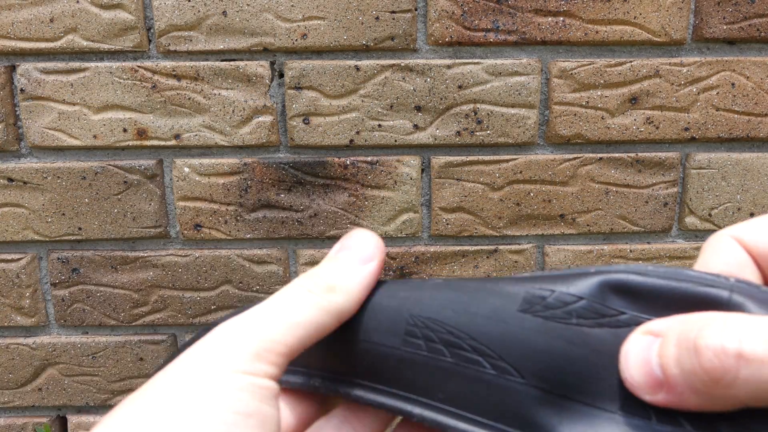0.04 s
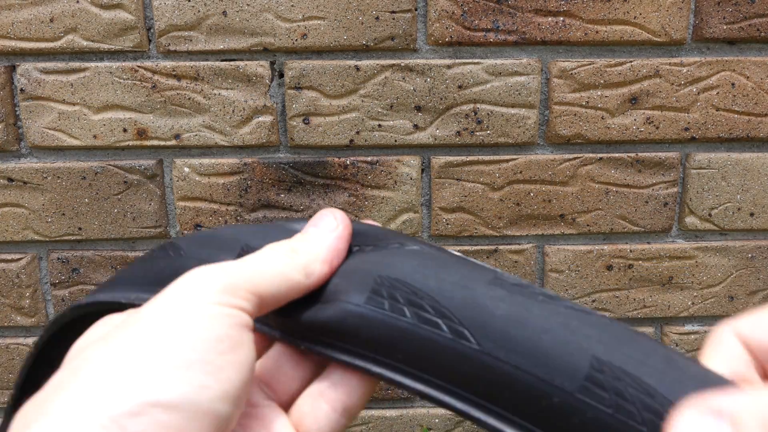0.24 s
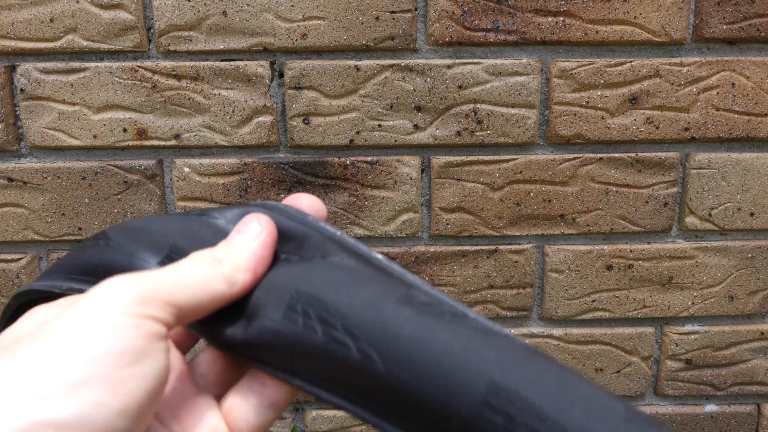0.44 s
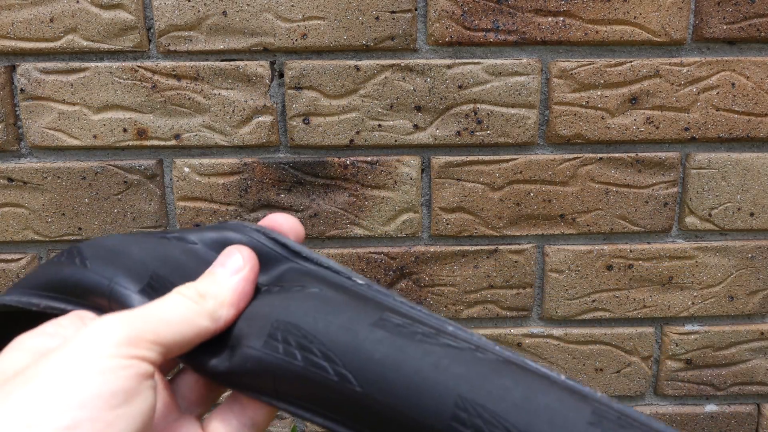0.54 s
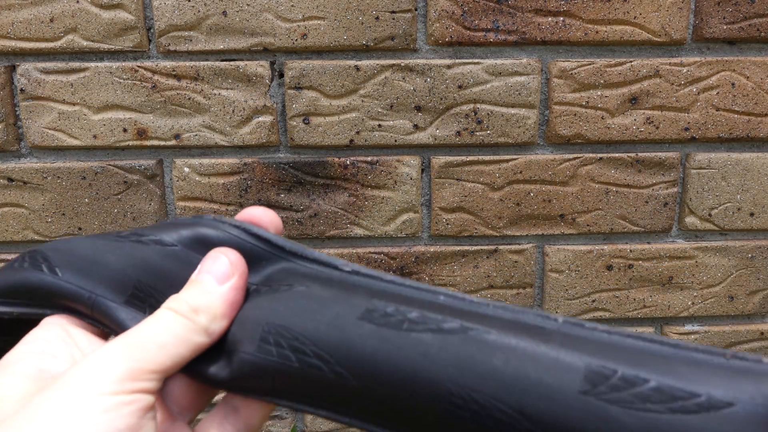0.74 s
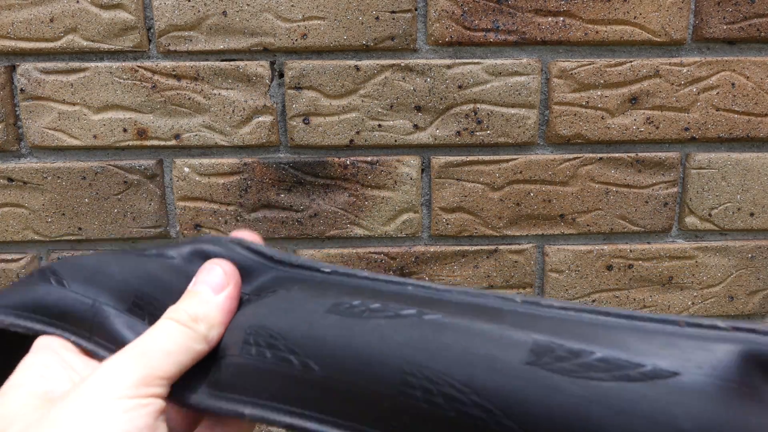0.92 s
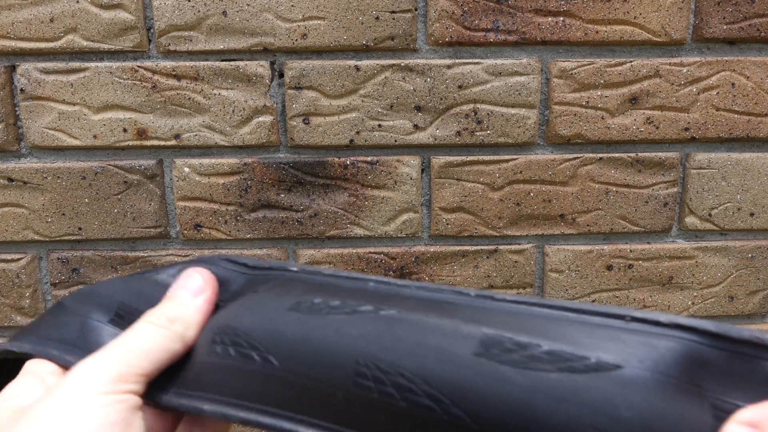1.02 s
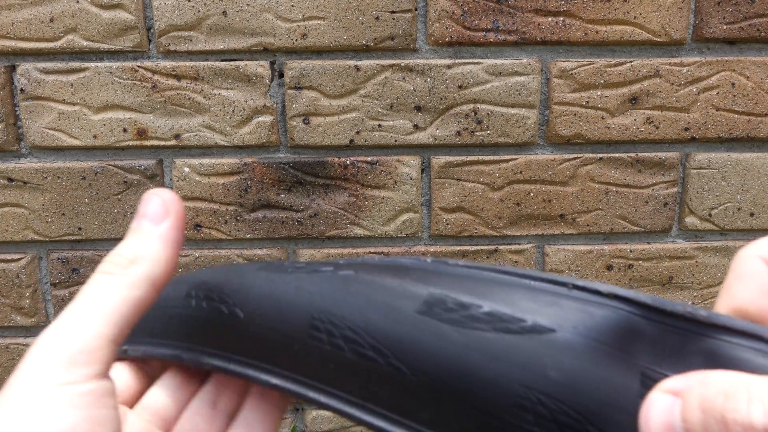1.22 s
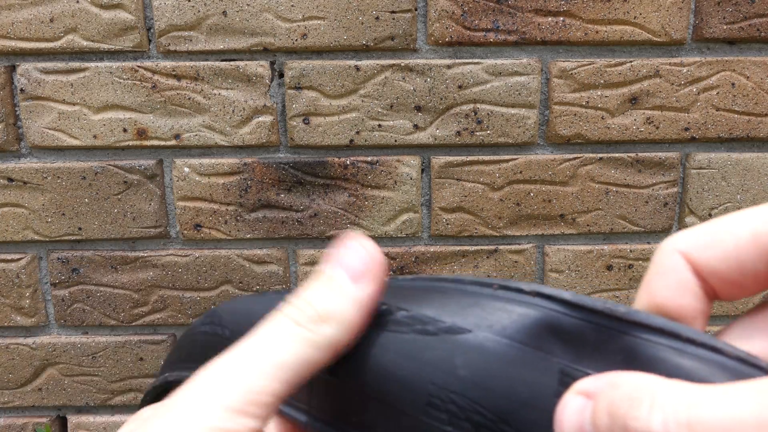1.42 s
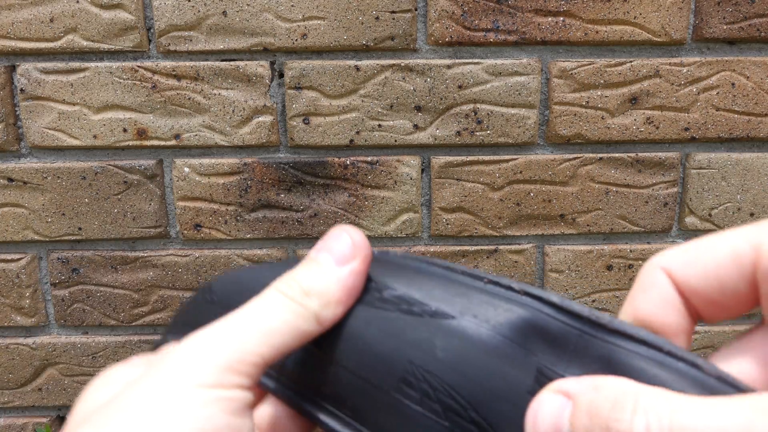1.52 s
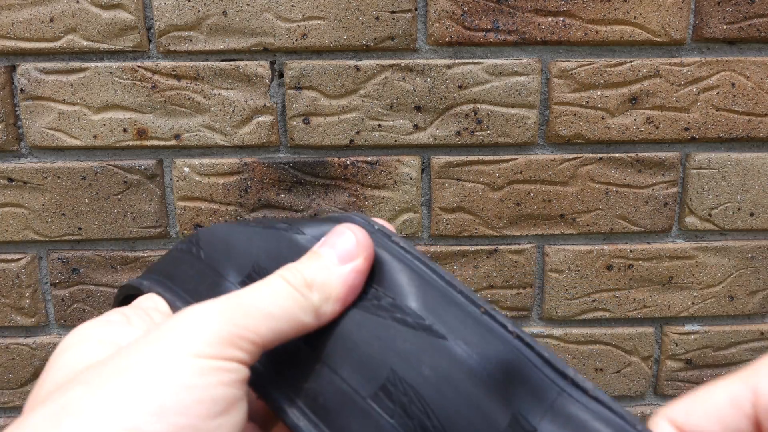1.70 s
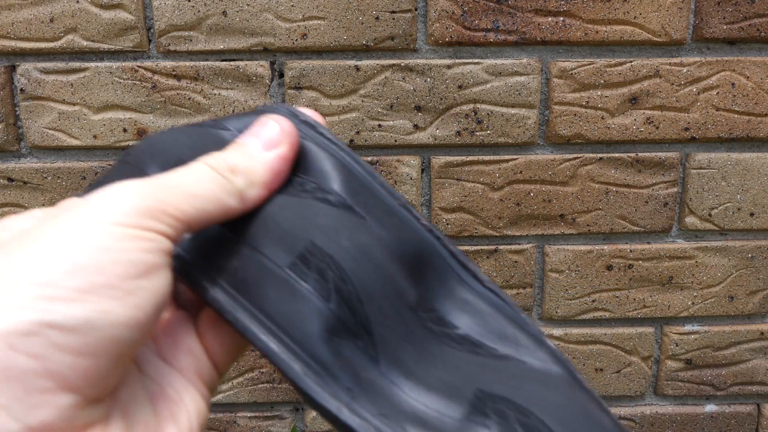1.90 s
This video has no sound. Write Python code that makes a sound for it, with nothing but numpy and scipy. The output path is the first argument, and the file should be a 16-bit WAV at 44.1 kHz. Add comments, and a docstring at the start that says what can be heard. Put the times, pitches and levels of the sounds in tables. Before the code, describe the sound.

Fingers pop and tap on a limp bicycle tyre, skin sliding softly between grips.

```python
"""A soft rub of skin on rubber, then a sharp pop: two hands work along a limp bicycle tyre,
close to a stereo microphone in a quiet yard before a brick wall. Fingers land on the hollow
casing with a pop of squeezed air and a low thump, the rubber flops over, and skin slides on it
between grips. A low rumble swells briefly now and then; distant outdoor noise lies underneath."""
import sys
import numpy as np
from scipy import signal
from scipy.fft import rfft, irfft
from scipy.io import wavfile
from scipy.ndimage import uniform_filter1d

SR = 44100
rng = np.random.default_rng(int(sys.argv[2]) if len(sys.argv) > 2 else 0)


def waveform_to_disk(signal):
    """Save audio, clipped to [-1, 1], as 16-bit WAV at the path in sys.argv[1]."""
    frames = np.transpose(np.atleast_2d(signal))
    scaled = np.clip(frames, -1, 1) * 32767
    samples = np.round(scaled).astype(np.int16)
    wavfile.write(sys.argv[1], SR, samples)


N = 85995

# Fingers landing and the casing flopping over: t/s, pop level/dB, pop f/Hz, pop half length/cycles,
# side wall level/dB, thump level/dB, thump f/Hz, thump t60/s, thump lead/s,
# crackle level/dB, crackle centre f/Hz, left over right/dB
FINGER_TAPS = [(0.2497, -5.5, 2130, 0.67, -19.5, -25.5, 215, 0.037, 0.0035, -43, 2880, -3),
               (0.7152, -38, 1050, 1, -43, -21.5, 211, 0.033, .001, -65, 5000, -0.7),
               (0.8755, -41, 1300, 1, -35, -51, 251, .03, 0, -48.5, 14000, 0),
               (0.9740, -26, 830, 0.49, -33, -25, 250, 0.032, -0.0019, -36.5, 4100, 1.5),
               (1.2155, -17.5, 2140, 0.63, -17.5, -18, 243, 0.04, -.001, -48, 2490, 0.2),
               (1.4900, -52, 1210, .6, -60, -38, 198, 0.034, -0.006, -59, 11000, -1),
               (1.6260, -40, 1180, 1, -32, -43.5, 260, 0.043, .001, -56, 3000, -2)]
# Air in the hollow of the tyre, rung by each pop: f/Hz, level against the pop/dB, t60/s
CAVITY_MODES = [(1100, -35, 0.032), (1568, -19.5, 0.028), (1836, -15.5, 0.018), (2086, -18.5, .036),
                (2460, -20.5, .028), (3000, -19, .018), (3510, -23.5, 0.024)]
# Skin sliding on rubber: peak t/s, rise/s, fall/s, rub level/dB, scuff level/dB, hiss level/dB,
# left over right/dB
SKIN_STROKES = [(0.04, 0.075, 0.12, -63.5, -63, -78, -3), (0.20, 0.032, 0.029, -71.5, -59.5, -69.5, -2),
                (0.262, 0.0091, 0.072, -54, -73, -80, 1), (0.33, .06, 0.082, -52, -69, -62.5, -3.5),
                (0.396, 0.026, 0.039, -47.5, -55.5, -54.5, -3.5), (0.56, 0.17, 0.32, -65, -61, -73, -2),
                (0.724, 0.044, 0.013, -54.5, -51, -53, -1), (0.778, 0.047, 0.017, -56.5, -52, -49, -1),
                (0.812, 0.0083, 0.0091, -68, -53, -63, -1), (0.83, 0.026, 0.12, -64.5, -64, -60.5, -1),
                (1.235, 0.042, 0.034, -63.5, -56.5, -62.5, -1),
                (1.319, 0.085, 0.036, -56.5, -66, -64.5, -0.5),
                (1.424, 0.09, 0.065, -61.5, -72, -63.5, -1.5), (1.65, 0.08, 0.094, -66, -61, -72.5, -2),
                (1.844, 0.033, 0.022, -51.5, -53.5, -54, -2.5), (1.92, 0.072, 0.03, -55.5, -61, -58, -2)]
# Spectra of a stroke's hollow rub, dull scuff and hiss: f/Hz, relative level/dB
RUB_SPECTRUM = [(200, -30), (500, -4.5), (720, -6.5), (950, -11.5), (1500, -1.5), (2100, -1), (2900, -4.5),
                (3500, -6), (4300, -16.5), (16000, -48)]
SCUFF_SPECTRUM = [(60, -27), (250, 8), (480, -13.5), (800, 2), (1050, -1.5), (1450, -1.5), (1900, -30.5),
                  (4000, -12), (16000, -23)]
HISS_SPECTRUM = [(300, -23), (2000, -2), (3600, 1), (4600, -2), (5500, 3.5), (6500, 1.5), (8000, -2.5),
                 (12000, -2), (16000, -2)]
# How alike the strokes reach the two sides of the microphone: f/Hz, likeness/0..1
SKIN_LIKENESS = [(200, 1), (2500, 0.75), (4000, 0.3), (7000, 0.053), (16000, 0.23)]
# Brief swells of low, narrow-band rumble: peak t/s, half length/s, level/dB, f/Hz
LOW_RUMBLE_SWELLS = [(0.574, .07, -53.5, 138), (0.852, 0.03, -48.5, 166), (1.313, 0.082, -56.5, 183),
                     (1.814, 0.19, -61, 310)]
# Spectrum of the distant outdoor background: f/Hz, relative level/dB
OUTDOOR_SPECTRUM = [(20, -16), (31, -20), (42, -9.5), (60, -4.5), (85, -0.5), (120, -2.5), (170, -5),
                    (240, -11.5), (330, -13), (480, -21), (800, -19.5), (1300, -25), (2200, -32.5),
                    (3300, -30.5), (5000, -36.5), (9000, -38.5), (16000, -40)]
# How alike that background reaches the two sides: f/Hz, likeness/0..1
OUTDOOR_LIKENESS = [(60, 1), (150, 1), (300, 0.9), (1000, 0.58), (2500, 0.2), (5000, 0.069), (16000, .1)]

TOP_HZ = 15900  # upper edge of the crackle and of the recorder's band


def tap(pop_db, pop_hz, pop_cycles, wall_db, thump_db, thump_hz, thump_t60, thump_lead,
        crackle_db, crackle_hz, pan_db):
    """A pop of squeezed air rings the hollow; the rubber thumps and the skin crackles."""
    t = np.arange(-SR // 100, SR // 10) / SR
    pop = np.exp(-(t * pop_hz / pop_cycles) ** 2) * np.cos(2 * np.pi * pop_hz * t)
    hollow = sum(amp(db) * mode(t, hz, t60, rise=0.00033) for hz, db, t60 in CAVITY_MODES)
    soft_skin = signal.butter(4, 3900, fs=SR, output="sos")  # dulls the pop
    air = signal.sosfiltfilt(soft_skin, pop + hollow)
    # The tyre's stiffer side wall is pressed just before the pop.
    side_wall = mode(t + 0.00214, hz=753, t60=0.022, rise=0.0033)
    swing = mode(t + thump_lead, thump_hz, thump_t60, rise=0.0022)
    thump = np.gradient(swing, t) / (2 * np.pi * thump_hz)
    tyre = amp(pop_db) * air + amp(wall_db) * side_wall + amp(thump_db) * thump
    return pan(pan_db) * (tyre + amp(crackle_db) * skin_crackle(t, crackle_hz))


def skin_crackle(t, centre_hz, spread_db=7, edge_ratio=1.66, decay_s=0.0014):
    """Skin slips in tiny uneven steps around the instant a finger lands."""
    slips = rng.standard_normal((3, len(t))) * amp(spread_db * rng.standard_normal(len(t)))
    stereo = slips[:2] + slips[2]  # the third row is common to both sides
    band_hz = [centre_hz / edge_ratio, min(centre_hz * edge_ratio, TOP_HZ)]
    crackle = signal.lfilter(*signal.butter(2, band_hz, "band", fs=SR), stereo)
    return unit(crackle) * np.exp(-abs(t) / decay_s)


def finger_taps():
    """Fingers land along the tyre, close to the microphone."""
    out = np.zeros((2, N))
    for at_s, *blow in FINGER_TAPS:
        add(out, at_s - 0.01, tap(*blow))  # a tap starts 10 ms ahead of its pop
    return out


def skin_slides(grains_per_s=7600, grain_db=2, flutter_db=2):
    """Dense tiny slips swell and fade with each stroke: a hollow rub, a dull scuff and a hiss."""
    t, out = np.arange(N) / SR, np.zeros((2, N))
    for k, spectrum in enumerate([RUB_SPECTRUM, SCUFF_SPECTRUM, HISS_SPECTRUM]):
        sizes = amp(grain_db * np.minimum(rng.exponential(1, N), 4))
        grains = sizes * (rng.random(N) < grains_per_s / SR)
        slips = rng.standard_normal((2, N)) * np.sqrt(unit(grains) ** 2 + 1)  # half grainy, half even
        power = np.zeros((2, N))
        for peak_s, rise_s, fall_s, *levels_db, pan_db in SKIN_STROKES:
            half_height_s = np.where(t < peak_s, rise_s, fall_s)
            swell = 1 / np.cosh(1.336 * (t - peak_s) / half_height_s)
            power += (pan(pan_db) * amp(levels_db[k]) * swell) ** 2
        out += np.sqrt(power) * coloured(slips, spectrum, SKIN_LIKENESS)
    uneven_pressure = amp(flutter_db * wander(samples=300))
    return out * uneven_pressure


def low_rumble_swells(width_octaves=0.17):
    """Brief swells of low, narrow-band rumble."""
    t, out = np.arange(N) / SR, np.zeros(N)
    hz = np.fft.rfftfreq(N, 1 / SR) + 1
    for peak_s, half_s, db, pitch_hz in LOW_RUMBLE_SWELLS:
        band = 1 / (1 + (np.log2(hz / pitch_hz) / width_octaves) ** 2)
        rumble = irfft(rfft(rng.standard_normal(N)) * band, N)
        out += amp(db) * unit(rumble) * np.exp(-((t - peak_s) / half_s) ** 2)
    return out


def yard_scatter(direct, t60_s=0.11, rise_s=0.00091, low_cut_hz=500):
    """Brick wall and ground send a short scatter back to the microphone, thin in the bass."""
    t = np.arange(SR // 4) / SR
    envelope = amp(-60 * t / t60_s) * (1 - np.exp(-t / rise_s))
    tail = rng.standard_normal((2, len(t))) * envelope
    tail = signal.lfilter(*signal.butter(1, low_cut_hz, "high", fs=SR), tail)
    return signal.fftconvolve(direct, tail / np.linalg.norm(tail[0]), axes=1)[:, :N]


def outdoors():
    """Distant rumble and a faint even hiss."""
    air = coloured(rng.standard_normal((2, N)), OUTDOOR_SPECTRUM, OUTDOOR_LIKENESS)
    return air * pan(db=-0.5)


def amp(db):
    """Decibels to gain."""
    return 10 ** (np.asarray(db) / 20)


def unit(x):
    """Scales to rms 1."""
    return x / np.sqrt(np.mean(x ** 2) + 1e-20)


def read(points, hz):
    """Reads a table on a log-frequency axis."""
    f, value = np.transpose(points)
    return np.interp(np.log(hz + 1), np.log(f + 1), value)


def pan(db):
    """Two gains, the left one db above the right."""
    return amp(np.array([[db], [-db]]) / 2)


def add(mix, at_s, sound):
    """Mixes a sound in at a time."""
    start = max(round(at_s * SR), 0)
    part = mix[:, start:start + sound.shape[1]]
    part += sound[:, :part.shape[1]]


def coloured(pair, spectrum, likeness):
    """Gives two unrelated noises a spectrum and a left-right likeness."""
    hz = np.fft.rfftfreq(N, 1 / SR)
    a, b = rfft(pair)
    alike = np.clip(read(likeness, hz), 0, 1)
    mid, side = a * np.sqrt(1 + alike), b * np.sqrt(1 - alike)
    left_right = np.array([mid + side, mid - side])
    return unit(irfft(left_right * amp(read(spectrum, hz)), N))


def wander(samples):
    """A smooth random drift of rms 1."""
    drift = uniform_filter1d(rng.standard_normal(N), samples)
    return unit(uniform_filter1d(drift, samples))


def mode(t, hz, t60, rise):
    """A damped vibration that swells from time zero."""
    t = np.maximum(t, 0)
    swell = 1 - np.exp(-(t / rise) ** 2)
    return swell * amp(-60 * t / t60) * np.cos(2 * np.pi * hz * t)


def scene():
    """Hands and tyre up close; behind them low swells, the taps' scatter and the far outdoors."""
    taps = finger_taps()
    close = taps + skin_slides()
    return close + low_rumble_swells() + amp(-13.5) * yard_scatter(taps) + amp(-51) * outdoors()


def record(dry):
    """The recorder cuts off the highest treble."""
    low_pass = signal.firwin(511, TOP_HZ, window=("kaiser", 9), fs=SR)
    return signal.oaconvolve(dry, low_pass[None], "same")


dry = scene()
out = record(dry)
waveform_to_disk(out)
```